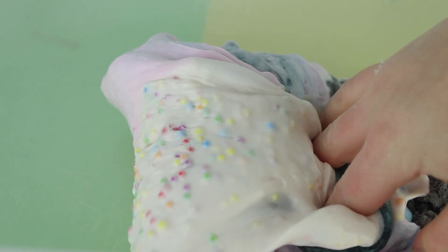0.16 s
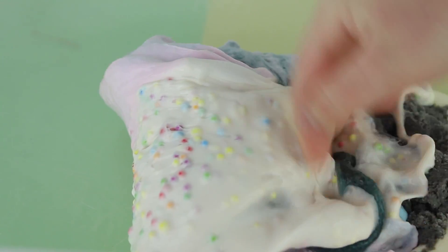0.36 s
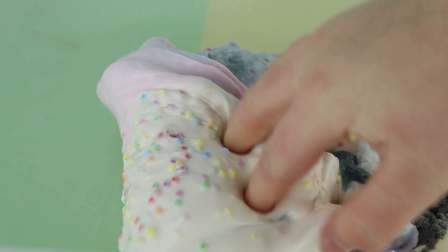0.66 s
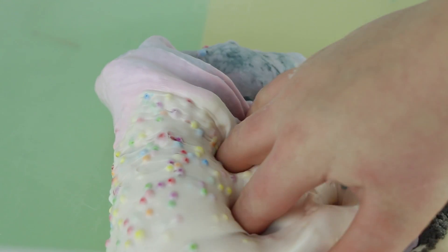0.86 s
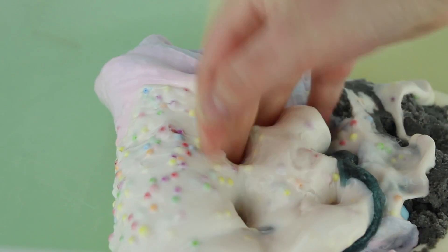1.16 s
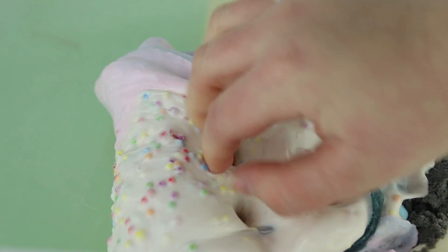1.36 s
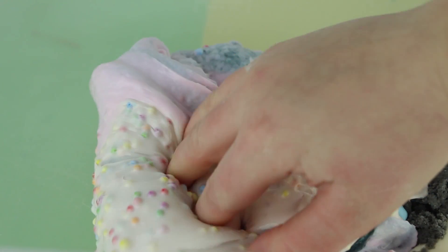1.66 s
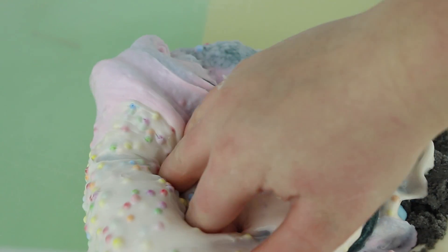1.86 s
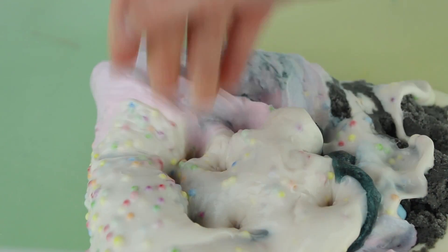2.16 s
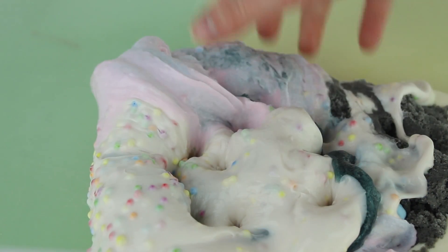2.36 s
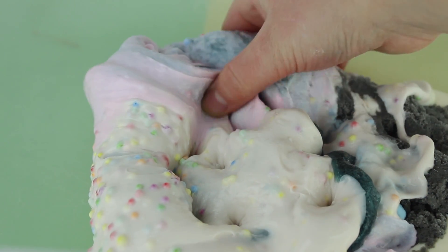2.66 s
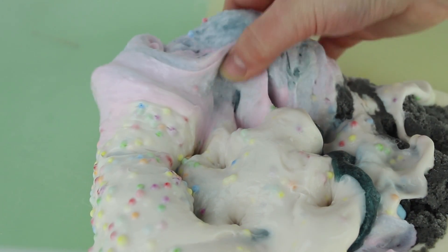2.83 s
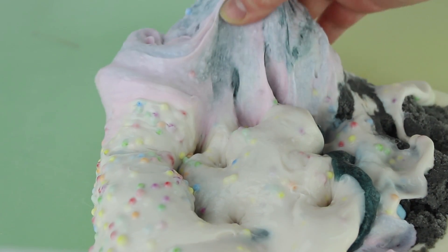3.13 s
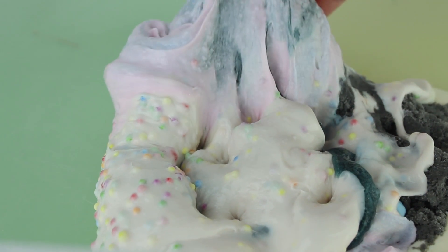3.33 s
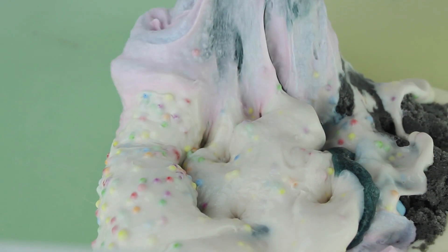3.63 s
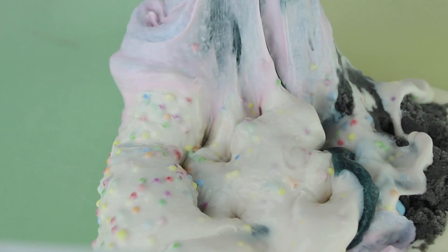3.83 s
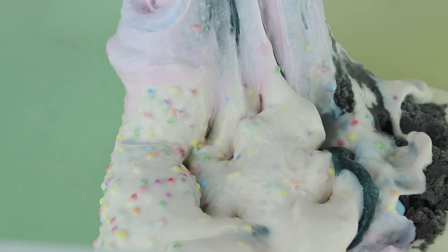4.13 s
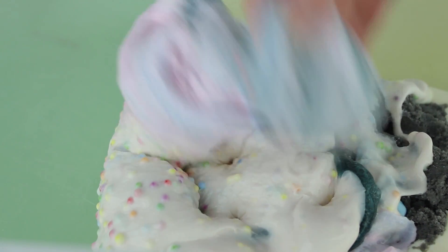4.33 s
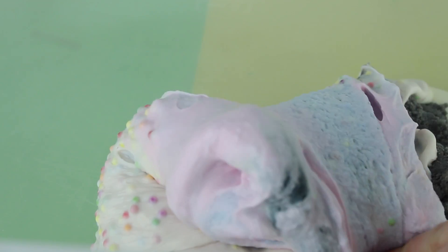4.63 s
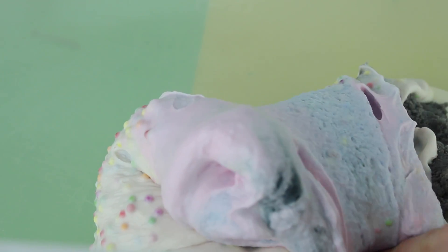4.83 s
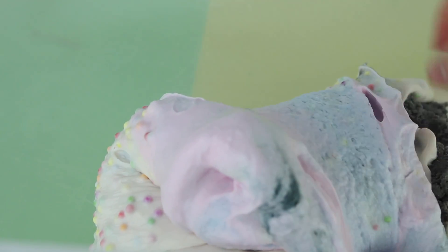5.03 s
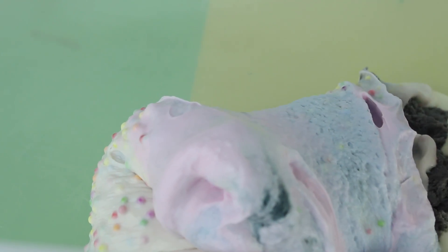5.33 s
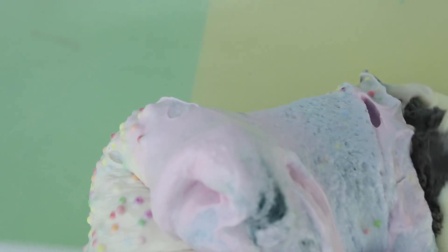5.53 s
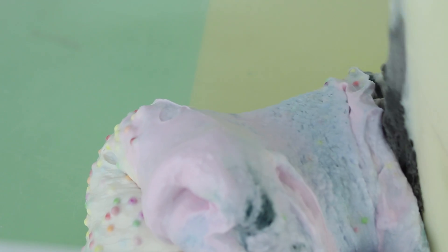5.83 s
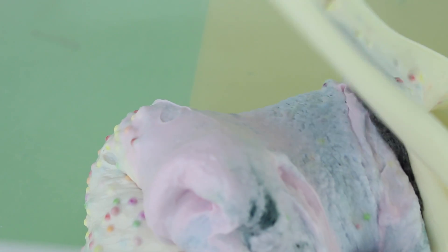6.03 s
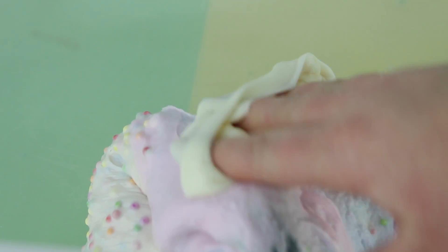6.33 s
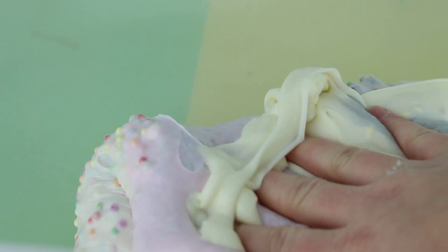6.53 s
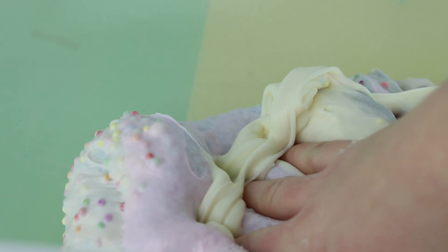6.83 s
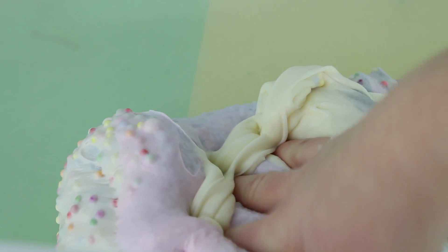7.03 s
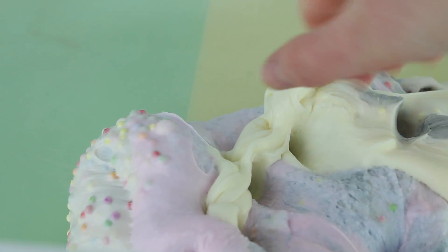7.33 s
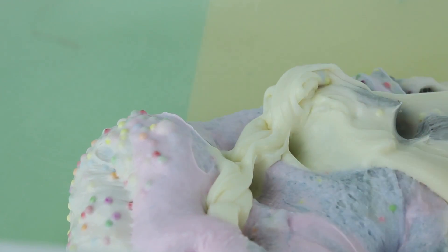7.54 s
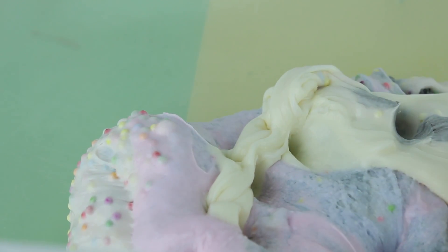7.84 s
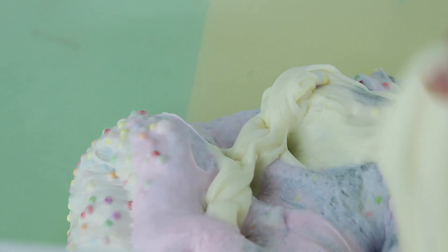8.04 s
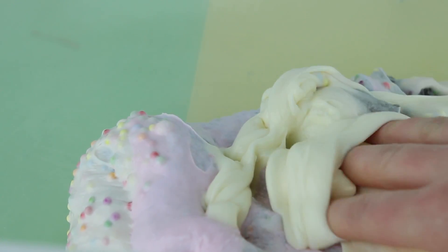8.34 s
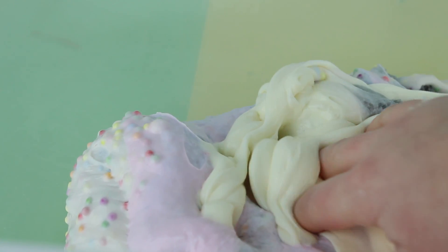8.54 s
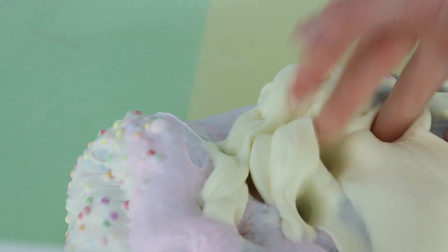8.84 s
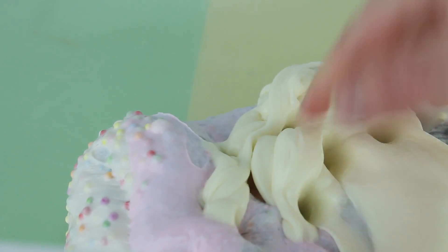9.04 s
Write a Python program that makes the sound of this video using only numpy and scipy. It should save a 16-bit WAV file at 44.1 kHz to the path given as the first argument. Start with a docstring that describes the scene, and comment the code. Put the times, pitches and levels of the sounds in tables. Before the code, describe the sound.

Hands knead a big mass of sticky slime close up, with sharp wet pops, soft hollow slaps, tacky ticks and short gurgling squelches in a small room.

```python
"""In a small room, hands knead a big mass of slime on a table, close to the microphone.
Air pockets burst with wet pops (a snap, a smack and a ringing hollow), pats slap and thud, tacky skin ticks.
Squeezed air gurgles through ringing folds, and larger bubbles glug with rising notes.
Stretched slime fizzes as tiny bubbles open. Echoes and a steady room tone surround it all.
Peaks beyond full scale are clipped flat, as in an overloaded recorder."""
import sys
import numpy as np
from scipy import signal
from scipy.fft import rfft, irfft
from scipy.io import wavfile

SR = 44100
rng = np.random.default_rng(int(sys.argv[2]) if len(sys.argv) > 2 else 0)


def master(y):
    """Save y as 16-bit WAV."""
    cut = np.clip(np.atleast_2d(y).T, -1, 1)
    pcm = np.round(cut * 32767)  # scale
    wavfile.write(sys.argv[1], SR, pcm.astype(np.int16))


N = 405279  # length of the scene [samples]

# Steady rumble and hiss of the room: (frequency [Hz], relative level [dB]), and its overall level [dB]
ROOM_TONE = [(25, -5), (108, 0.5), (300, -3), (760, -11), (2500, -14), (7500, -20.5), (10000, -30),
             (16000, -44.5)]
ROOM_TONE_DB = -50
# Slime being drawn out: (time of greatest strain [s], fizz before trim and colour [dB],
# build-up [s], relaxation [s]); both durations are for a factor of e in loudness
PULLS = [(.39, -45.5, 0.044, 0.08), (1.2, -40, 0.022, 0.047), (2.78, -52.5, 0.14, 0.41),
         (4.08, -53, 0.19, 0.13), (4.56, -48.5, .05, 0.18), (5.65, -51.5, 0.2, 0.17),
         (7.22, -48, 0.045, 0.14), (7.56, -51, 0.08, 0.069), (8.07, -50, 0.11, 0.084)]
# Fizz of the resting slime before trim and colour [dB]; bubbles that prickle at full strain [per s]
REST_DB, PRICKLES_PER_S = -66.5, 76
# Colour of the fizz: (frequency [Hz], gain [dB])
FIZZ_COLOUR = [(500, -11.5), (2000, -1.5), (7700, 9), (10000, -3.5), (16000, -26)]
# Tacky spots letting go: (time [s], level [dB], brightness [Hz])
TICKS = [(0.1283, -44.5, 6740), (0.2813, -50, 3470), (0.377, -33, 5430), (0.8128, -19.5, 9600),
         (1.047, -46, 5450), (1.1964, -20.5, 5900), (1.7438, -32.5, 5140), (1.9595, -38.5, 5000),
         (2.6994, -23, 6400), (2.754, -29.5, 5900), (2.8758, -34, 2900), (2.9996, -43, 6000),
         (3.0428, -38, 6200), (3.1516, -38, 7150), (3.2648, -37.5, 7000), (3.939, -33.5, 6800),
         (4.257, -39.5, 6740), (4.4256, -29, 5370), (4.489, -35, 4400), (4.554, -23, 7460),
         (4.7374, -30, 4250), (4.955, -31.5, 2850), (5.335, -30.5, 1980), (6.23, -40.5, 7300),
         (6.6929, -24.5, 1960), (6.8463, -46.5, 6500), (6.9815, -46, 7500), (7.3178, -21, 4100),
         (7.7854, -39.5, 4760), (8.4326, -39, 7040), (8.447, -38, 1730), (8.571, -39, 6000)]
# Colour shared by all ticks: (frequency [Hz], gain [dB])
TICK_COLOUR = [(100, -0.5), (8200, 1.5), (10500, -6.5), (16000, -25)]
# Squeezes and peels: (middle [s], half of the whole duration [s],
# gurgle before trim [dB], crackle before trim [dB])
SQUELCHES = [(0.183, 0.037, -48.5, -45), (1.414, 0.026, -43.5, -39), (2.13, 0.09, -62, -43.5),
             (2.673, 0.084, -50.5, -42), (2.873, 0.067, -49, -45.5), (3.35, 0.096, -48, -81),
             (4.081, 0.2, -71, -51), (4.543, 0.11, -47.5, -44), (4.991, 0.059, -37.5, -32),
             (5.338, 0.032, -28.5, -44), (5.409, 0.09, -31.5, -48), (5.639, 0.084, -49.5, -48.5),
             (7.222, 0.089, -40, -39.5), (8.117, 0.042, -47.5, -38)]
# Hollow folds set ringing by squeezed air, before random detuning:
# (frequency [Hz], relative level [dB], time to fall 60 dB [s])
FOLD_MODES = [(130, -6, 0.11), (249, -4, 0.041), (367, 0, 0.037), (474, -6.5, 0.034), (867, -11, 0.034)]
# Colour of wet surfaces crackling apart: (frequency [Hz], gain [dB])
CRACKLE_COLOUR = [(200, -20), (2200, 3), (8000, 3), (10000, -8), (16000, -32)]
# Bursting air pockets: (time [s], middle pitch of the hollow [Hz], ring of the hollow [dB],
# wet smack [dB], snap of the skin [dB])
POPS = [(0.41, 570, -27, -17, -12), (0.4135, 580, -28, -42, -10), (0.4208, 626, -20, -21.5, -26),
        (0.458, 500, -34, -50, -25), (1.2002, 990, -32, -24, -15.5), (1.2066, 550, -30.5, -24.5, -7.5),
        (1.3895, 1260, -36, -35, -34), (2.1575, 616, -20.5, -22.5, -27), (2.187, 920, -42, -22, -33),
        (2.1936, 900, -30, -17, -15.5), (2.1986, 870, -22, -11, -16), (2.222, 1100, -45, -42, -26),
        (2.2258, 1260, -37, -24, -21), (2.49, 380, -33, -33.5, -32), (2.6289, 397, -40, -32.5, -23),
        (5.04, 423, -26.5, -40, -36), (7.3176, 510, -35, -26.5, -26.5), (8.885, 597, -25, -29, -23),
        (8.9147, 365, -17.5, -18.5, -9), (8.9627, 358, -21, -21, -19)]
# Colours of the wet smack and of the snapping skin: (frequency [Hz], gain [dB])
SMACK_COLOUR = [(150, -31.5), (650, 0.5), (2200, -2), (3300, -2.5), (4300, -29.5), (16000, -57)]
SNAP_COLOUR = [(500, -27), (3700, -10), (4900, -3), (7200, 1), (8500, -4.5), (10500, -17), (16000, -37.5)]
# Faint ringing that lingers after a smack, before random detuning:
# (frequency [Hz], relative level [dB], time to fall 60 dB [s])
AFTER_RING = [(930, 8, 0.12), (1222, -2, 0.42)]
# Pats and squeezes of the mass: (time [s], table thud [dB], hollow body [dB], slap [dB])
PATS = [(0.424, -36, -26.5, -19.5), (1.247, -40.5, -35.5, -55), (2.162, -30.5, -21.5, -23),
        (2.505, -45.5, -38.5, -33), (2.627, -46, -31, -42), (5.19, -51, -21, -24), (5.198, -32, -21, -23.5),
        (5.283, -35, -21, -24.5), (6.6923, -31, -10, -25), (7.2749, -24.5, -18, -20.5),
        (7.288, -31.5, -25.5, -32), (7.661, -37, -27, -26), (7.6907, -33.5, -14.5, -28.5),
        (7.897, -44, -45.5, -71), (8.162, -41.5, -40.5, -58), (8.99, -37, -28.5, -24.5),
        (9.04, -40.5, -33.5, -37)]
# Colour of the slapping skin: (frequency [Hz], gain [dB])
SLAP_COLOUR = [(50, -40.5), (200, -19.5), (500, 5.5), (1200, -1.5), (2100, -2.5), (8000, -17), (16000, -59)]
# The hollow mass, and its thud on the table, before random detuning:
# (frequency [Hz], relative level [dB], time to fall 60 dB [s])
BODY_MODES = [(253, -7, 0.057), (364, 1, 0.047), (449.4, 0, 0.043), (623, -13, 0.063), (1020, -7, 0.02)]
THUD_MODES = [(111, -8, 0.11), (199, -18, 0.068)]
# Larger bubbles welling up through the folds: (time [s], starting pitch [Hz], level [dB])
GLUGS = [(5.226, 430, -21), (5.335, 1150, -31), (5.355, 820, -28), (5.394, 890, -24), (5.412, 350, -25),
         (5.428, 880, -31), (7.662, 230, -26), (8.918, 580, -20)]
# How long the room's echoes last: (frequency [Hz], time to fall 60 dB [s])
ROOM_T60 = [(100, 0.31), (5000, 0.27), (12000, 0.06)]
# Strength of the room's tail: (frequency [Hz], gain [dB])
ROOM_SEND = [(110, -4), (170, 3), (700, -6), (1250, -2), (2500, -6.5), (12000, -8)]
EDGE_HZ = 16400  # upper edge of the recorded band


def amp(db):
    """Turns decibels into a gain."""
    return 10 ** (np.asarray(db) / 20)


def evened(x):
    """Scales a sound to an average (rms) strength of 1."""
    return x / np.sqrt(np.mean(x ** 2) + 1e-20)


def burst(x, span):
    """Scales a short sound so that its energy equals rms 1 held for span seconds."""
    return x * np.sqrt(span * SR / (np.sum(x ** 2) + 1e-20))


def read(points, hz):
    """Reads a curve between its points, on a log-frequency axis."""
    f, value = np.transpose(points)
    return np.interp(np.log(hz + 1), np.log(f + 1), value)


def add(mix, s, sound):
    """Mixes a sound in, starting at time s [s]."""
    part = mix[max(round(s * SR), 0):][:len(sound)]
    part += sound[:len(part)]


def colour(x, points, size=2048):
    """Filters to the given spectrum with no sound before the attack, so that attacks stay sharp."""
    log_gain = np.log(amp(read(points, abs(np.fft.fftfreq(size, 1 / SR)))))
    taps = np.fft.ifft(np.exp(np.conj(signal.hilbert(log_gain)))).real
    return signal.oaconvolve(x, taps[:size // 2])[:len(x)]


def low_cut(x, hz):
    """Removes bass, because small objects radiate little of it."""
    return signal.sosfilt(signal.butter(2, hz, "high", fs=SR, output="sos"), x)


def grains(count, per_s, spread_db):
    """Sparse clicks of random sign; a few are much larger than the rest."""
    size = amp(spread_db * np.minimum(rng.exponential(1, count), 4))
    sign = rng.choice([-1, 1], count)
    happens = rng.random(count) < per_s / SR
    return size * sign * happens


def tear(length, rest, rise=0.0004, count=4096):
    """A film gives way: one sharp break sets off a run of tiny ones that builds and dies."""
    t = np.arange(count) / SR
    swell = np.exp(-t / length) * (1 - np.exp(-t / rise))
    run = grains(count, per_s=14000, spread_db=2.0) * swell
    return signal.unit_impulse(count) + rest * run / np.linalg.norm(run)


def ring(modes, detune, count=12000):
    """Dying tones that start together; each blow shifts them a little, as the soft mass changes shape."""
    t = np.arange(count) / SR
    out = np.zeros(count)
    for hz, db, t60 in modes:
        shifted_hz = hz * (1 + detune * rng.uniform(-0.75, 1))
        out += amp(db - 60 * t / t60) * np.sin(2 * np.pi * shifted_hz * t)
    return out


def room_tone():
    """Steady low rumble and microphone hiss, made by shaping random noise."""
    shape = amp(read(ROOM_TONE, np.fft.rfftfreq(N, 1 / SR)))
    noise = irfft(rfft(rng.standard_normal(N)) * shape, N)
    return amp(ROOM_TONE_DB) * evened(noise)


def stretch(fizz_db=-1, prickle_db=-3, waver_db=3.5, kinds=8):
    """Tiny bubbles open as strain builds and relaxes; the more strain, the more prickle above the fizz."""
    t = np.arange(N) / SR
    # the resting fizz wavers, with eight new random values a second
    waver = np.interp(t, np.arange(80) / 8, rng.standard_normal(80))
    power = amp(REST_DB + waver_db * waver) ** 2
    for s, db, build, relax in PULLS:
        strain = np.exp(-np.maximum((s - t) / build, (t - s) / relax))
        power = power + (amp(db) * strain) ** 2
    level = np.sqrt(power)
    fine = amp(fizz_db) * evened(grains(N, per_s=4500, spread_db=3.5))
    rate = PRICKLES_PER_S * np.sqrt(level / level.max()) / kinds
    # several kinds of prickle, each with its own tear
    prickles = np.zeros(N)
    for _ in range(kinds):
        clicks = grains(N, per_s=rate, spread_db=3.0)
        prickles += signal.oaconvolve(clicks, tear(length=0.0025, rest=1.8))[:N]
    return level * colour(fine + amp(prickle_db) * evened(prickles), FIZZ_COLOUR)


def ticks(skirt_db=-13):
    """Tiny bonds break as tacky skin lets go, each tick with its own brightness."""
    out = np.zeros(N)
    for s, db, hz in TICKS:
        # a hump of treble that falls away on both sides
        hump = [(hz / 12, 1.68 * skirt_db), (hz / 3, 0.5 * skirt_db), (hz * 1.14, 0),
                (hz * 3, skirt_db), (hz * 10, 3 * skirt_db)]
        tick = colour(colour(tear(length=0.0029, rest=5.8), hump), TICK_COLOUR)
        add(out, s, amp(db) * burst(tick, span=0.0039))
    return out


def bubbles(count, per_s=170, cycles=14, low_hz=700, high_hz=2300):
    """Small trapped bubbles burst at random, each with a short ring at its own pitch."""
    out, t = np.zeros(count), np.arange(1024) / SR
    for when, pitch, strength in rng.random(size=(128, 3))[:round(per_s * count / SR)]:
        hz = low_hz * (high_hz / low_hz) ** pitch
        note = np.sin(2 * np.pi * hz * t) * amp(-60 * t * hz / cycles)
        add(out, when * count / SR, strength * note)
    return out


def squelches(gurgle_db=-1, crackle_db=-1, lump_db=3.5, bubble_db=-5):
    """Puffs of squeezed air ring the hollow folds while wet surfaces crackle apart and small bubbles burst."""
    out = np.zeros(N)
    for s, length, low_db, high_db in SQUELCHES:
        count = int(2 * length * SR)
        # the slime sticks and slips, so the flow comes in lumps
        lumps = np.interp(np.arange(count) / SR, np.arange(64) / 110, rng.uniform(-1, 1, 64))
        swell = np.hanning(count) * amp(lump_db * lumps)
        puffs = grains(count, per_s=600, spread_db=3.5)
        # cut twice for a steeper loss of bass
        folds = low_cut(low_cut(ring(FOLD_MODES, detune=0.061), hz=95), hz=95)
        gurgle = burst(signal.oaconvolve(puffs, folds)[:count] * swell, span=length)
        clicks = grains(count, per_s=1500, spread_db=2.0)
        crackle = burst(colour(clicks, CRACKLE_COLOUR) * swell, span=length)
        add(out, s - length, gurgle * amp(low_db + gurgle_db) + crackle * amp(high_db + crackle_db))
        # bubbles need both air and wetness, so their level lies between the two
        bursting = burst(bubbles(count) * swell, span=length)
        add(out, s - length, bursting * amp((low_db + high_db) / 2 + bubble_db))
    return out


def pops(cavity_cycles=16, rise=0.023, after_db=-23):
    """A pocket's skin snaps, wet walls smack apart, the opening hollow rings upward, a faint ring lingers."""
    out, t = np.zeros(N), np.arange(4096) / SR
    for s, hz, cavity_db, smack_db, snap_db in POPS:
        glide = hz * (1 + rise * (.5 - np.exp(-t / 0.0058)))
        # small hollows die sooner: each rings for the same number of cycles
        cavity = np.sin(2 * np.pi * np.cumsum(glide) / SR) * amp(-60 * t * hz / cavity_cycles)
        smack = colour(tear(length=0.0052, rest=3.0), SMACK_COLOUR)
        after = ring(AFTER_RING, detune=0.016)
        snap = colour(tear(length=0.0031, rest=2.2), SNAP_COLOUR)
        add(out, s, amp(cavity_db) * burst(low_cut(cavity, hz / 2), span=0.0047))
        add(out, s, amp(smack_db) * burst(smack, span=0.0059))
        add(out, s, amp(smack_db + after_db) * burst(after, span=0.081))
        add(out, s, amp(snap_db) * burst(snap, span=0.0045))
    return out


def pats():
    """A slap of skin; as the palm flattens, the hollow mass rings and thuds into the table."""
    out = np.zeros(N)
    for s, thud_db, body_db, slap_db in PATS:
        slap = colour(tear(length=0.0082, rest=8.4, rise=0.00038), SLAP_COLOUR)
        body = low_cut(ring(BODY_MODES, detune=0.052), hz=215)
        thud = low_cut(ring(THUD_MODES, detune=0.09), hz=80)
        add(out, s, amp(slap_db) * burst(slap, span=0.0073))
        # the body and then the thud follow within milliseconds
        add(out, s + 0.000985, amp(body_db) * burst(body, span=0.0086))
        add(out, s + 0.0046, amp(thud_db) * burst(thud, span=0.038))
    return out


def glugs(cycles=34, rise=0.098, open_s=0.0015, count=6000):
    """A larger bubble wells up through a fold; its note bends upward as it opens, and dies away."""
    out, t = np.zeros(N), np.arange(count) / SR
    for s, hz, db in GLUGS:
        age = t * hz / cycles  # reaches 1 when the note has fallen 60 dB
        glide = hz * (1 + rise * np.minimum(age, 1))
        fade = amp(-60 * age) * (1 - np.exp(-t / open_s))
        note = np.sin(2 * np.pi * np.cumsum(glide) / SR) * fade
        add(out, s, amp(db) * burst(note, span=0.01))
    return out


def echoes(early_db=-7, early_s=0.0081, count=26000):
    """Quick reflections from the table and nearby things, then a short tail that dies band by band."""
    t = np.arange(count) / SR
    early = grains(count, per_s=2500, spread_db=1.0) * np.exp(-t / early_s) * (t > .0015)
    scatter = evened(grains(count, per_s=4000, spread_db=1)) * (t > .006)
    hz, when, bands = signal.stft(scatter, SR, nperseg=256)
    t60 = read(ROOM_T60, hz)[:, None]
    # the square root keeps long and short decays at comparable energy
    decay = amp(-60 * when / t60) * np.sqrt(np.log(10 ** 6) / t60 / SR)
    send = amp(read(ROOM_SEND, hz))[:, None]
    tail = signal.istft(bands * decay * send, SR, nperseg=256)[1][:count]
    return tail + amp(early_db) * early / np.linalg.norm(early)


def room(x, count=5):
    """The hands move over the mass, so the sound shifts between several patterns of echoes."""
    t = np.arange(N) / SR
    out = x
    for k in range(count):
        # the squares of all the shares add up to 1
        share = np.sqrt(2 / count) * np.cos(np.pi * (t + k / count))
        out = out + signal.oaconvolve(x * share, echoes())[:N]
    return out


def scene():
    """All the handling with its echoes, over the steady room tone, as one channel."""
    handling = stretch() + ticks() + squelches() + pops() + pats() + glugs()
    return (room(handling) + room_tone())[None]


def record(dry):
    """Peaks beyond full scale clip; then the highest treble is filtered off."""
    clipped = np.clip(dry, -1, 1)
    band_limit = signal.firwin(511, EDGE_HZ, window=("kaiser", 9), fs=SR)
    return signal.oaconvolve(clipped, band_limit[None], "same")


dry = scene()
out = record(dry)
master(out)
```